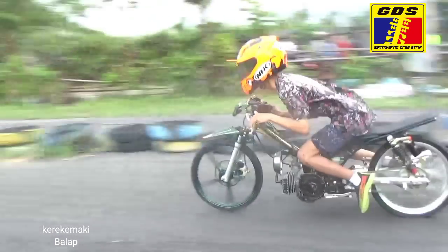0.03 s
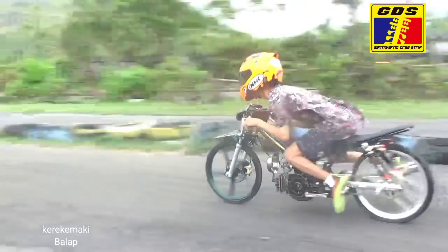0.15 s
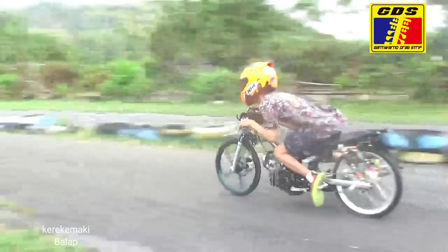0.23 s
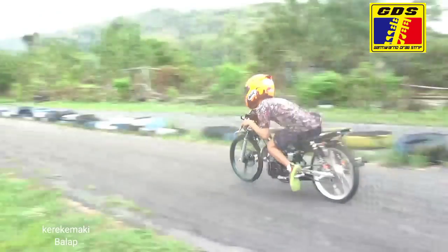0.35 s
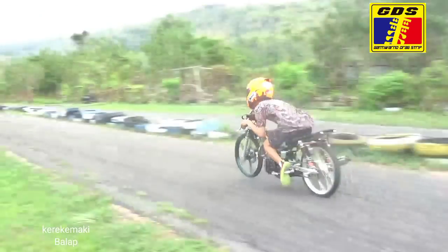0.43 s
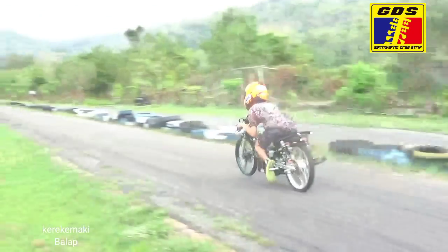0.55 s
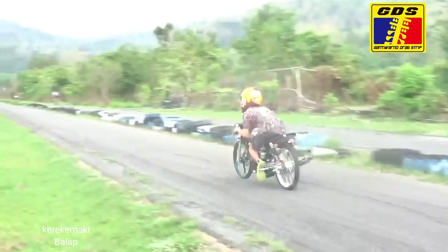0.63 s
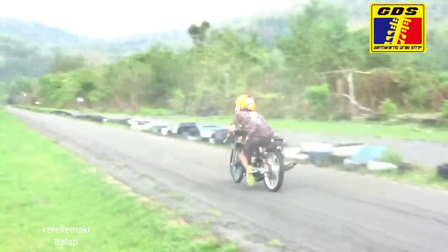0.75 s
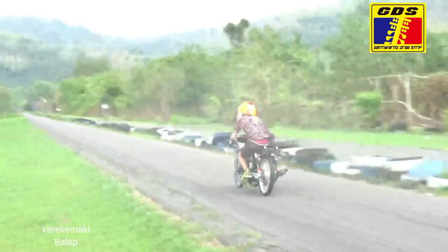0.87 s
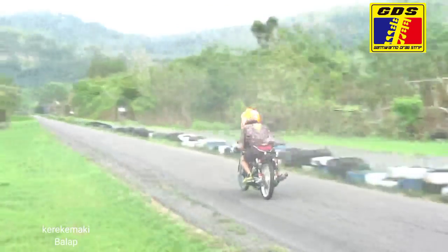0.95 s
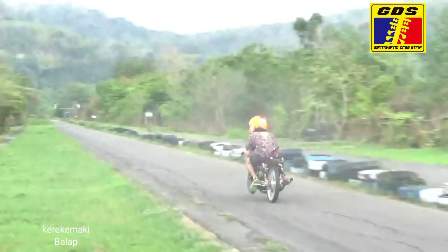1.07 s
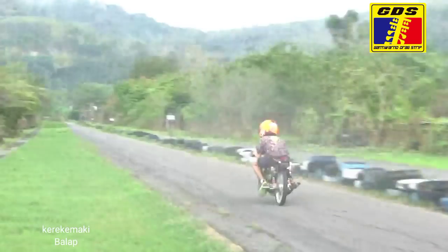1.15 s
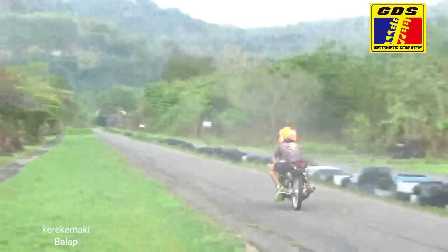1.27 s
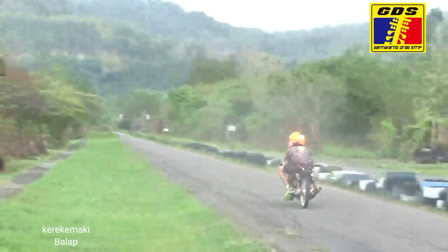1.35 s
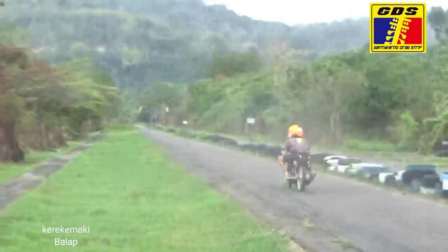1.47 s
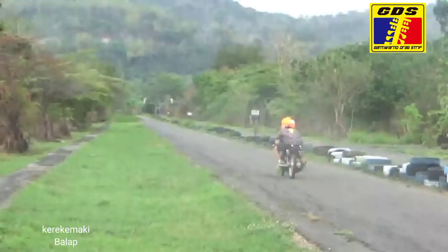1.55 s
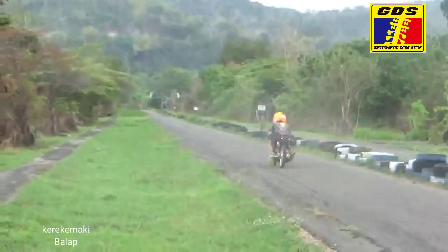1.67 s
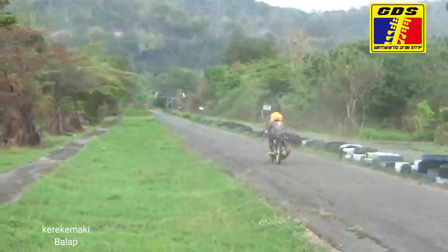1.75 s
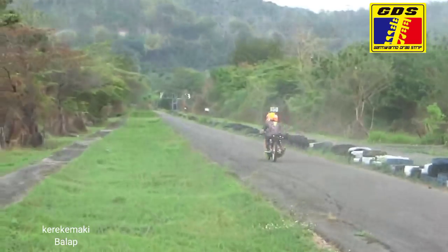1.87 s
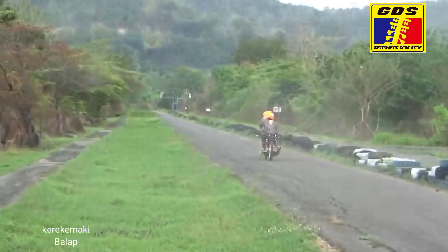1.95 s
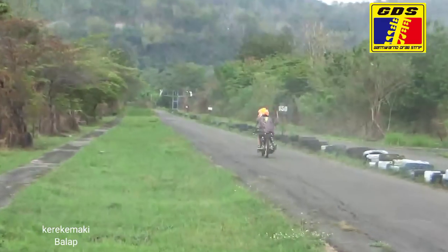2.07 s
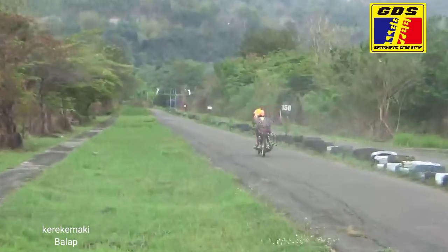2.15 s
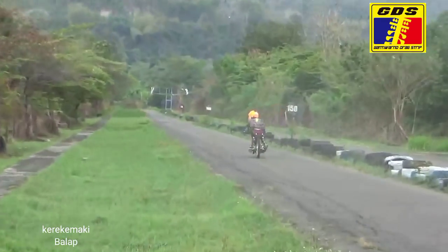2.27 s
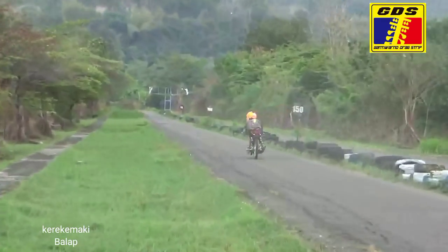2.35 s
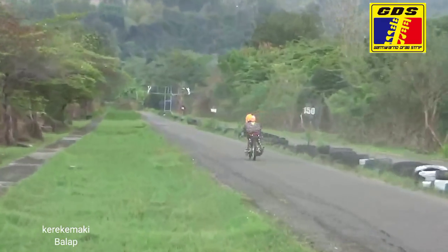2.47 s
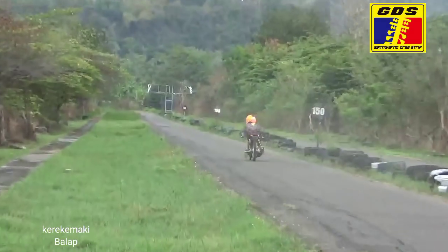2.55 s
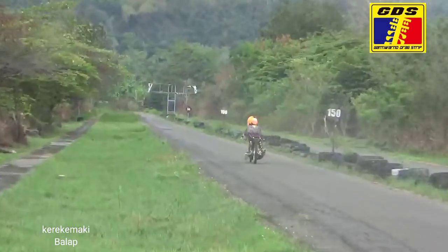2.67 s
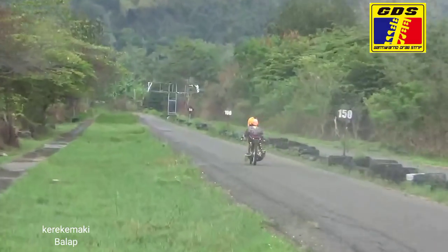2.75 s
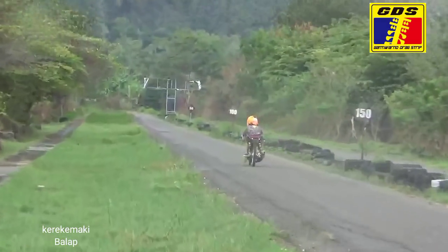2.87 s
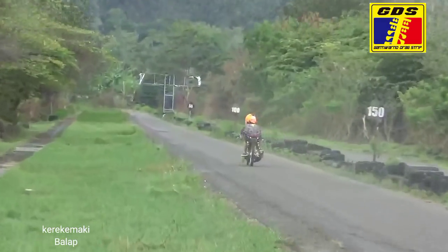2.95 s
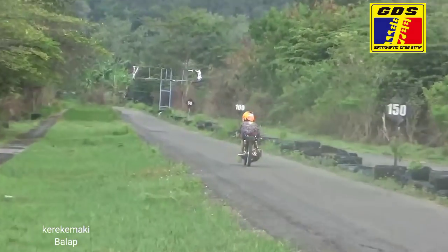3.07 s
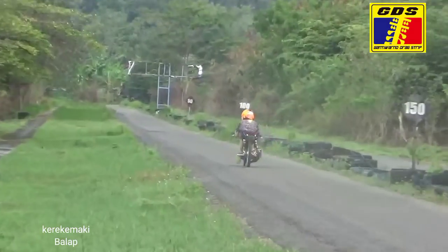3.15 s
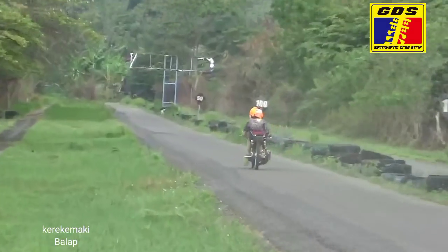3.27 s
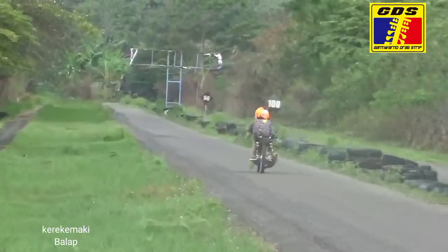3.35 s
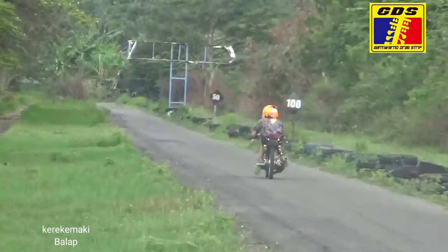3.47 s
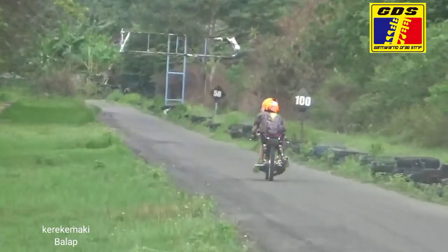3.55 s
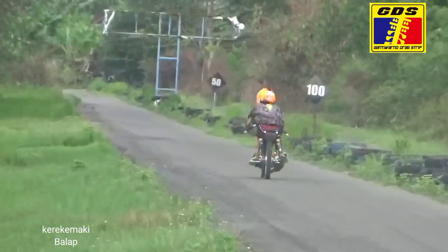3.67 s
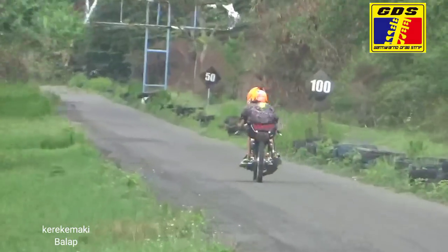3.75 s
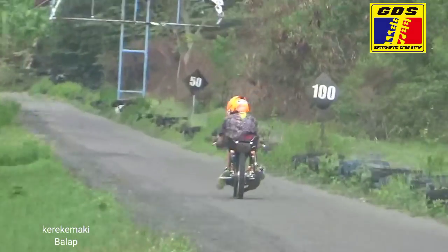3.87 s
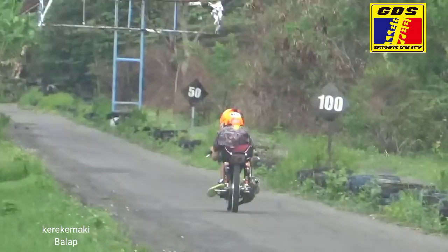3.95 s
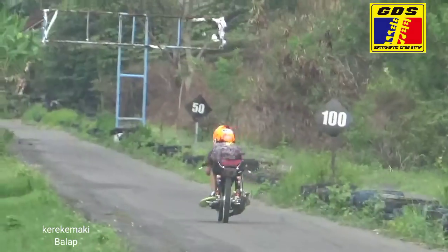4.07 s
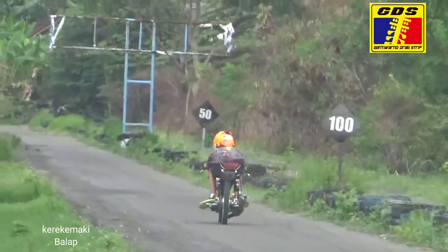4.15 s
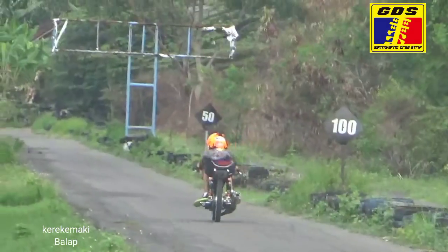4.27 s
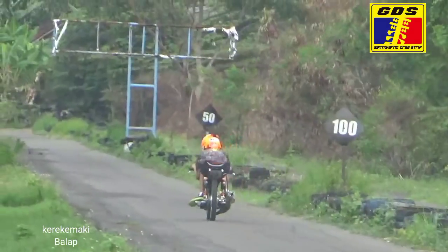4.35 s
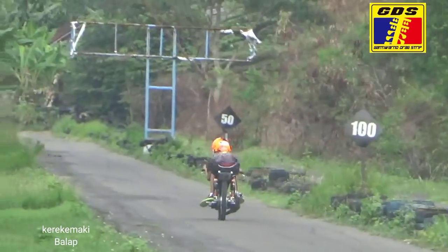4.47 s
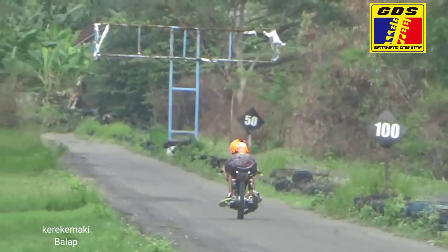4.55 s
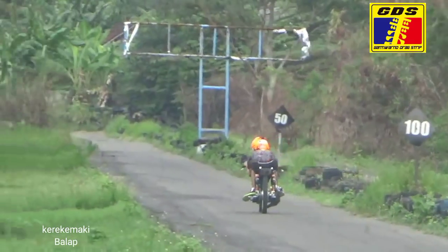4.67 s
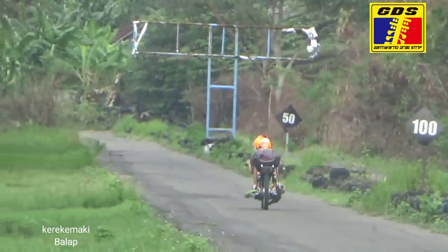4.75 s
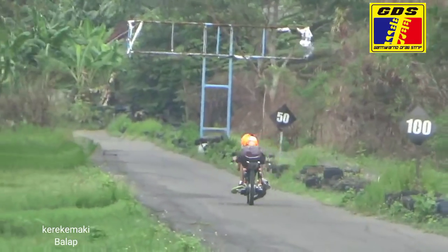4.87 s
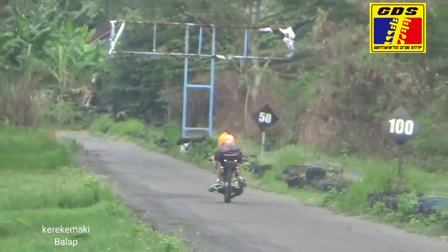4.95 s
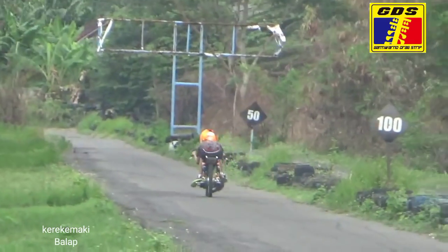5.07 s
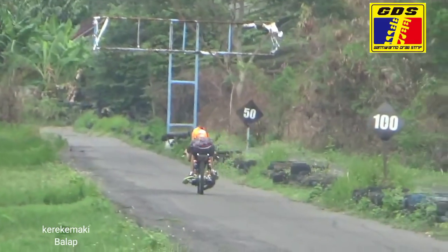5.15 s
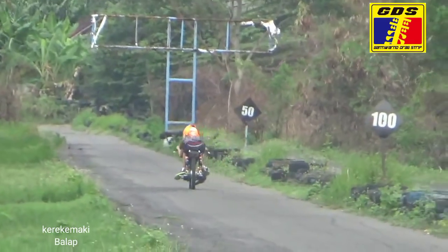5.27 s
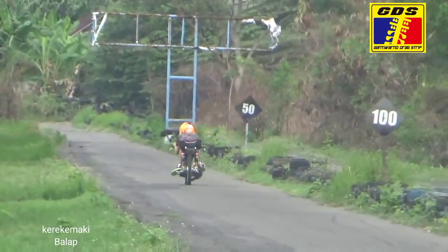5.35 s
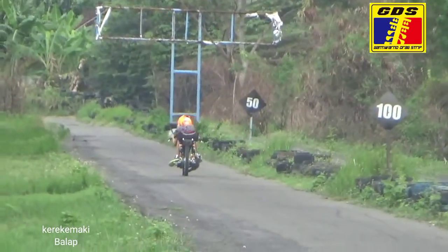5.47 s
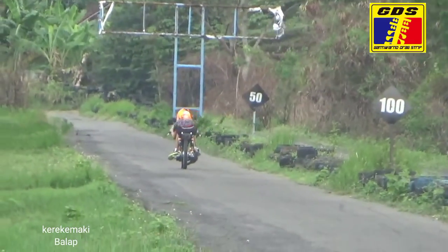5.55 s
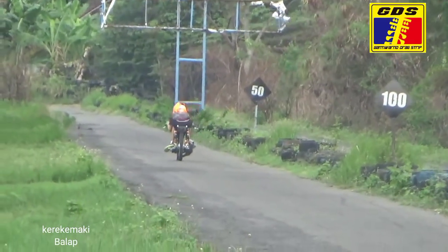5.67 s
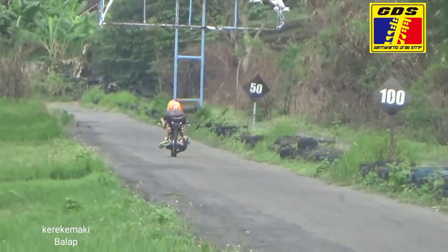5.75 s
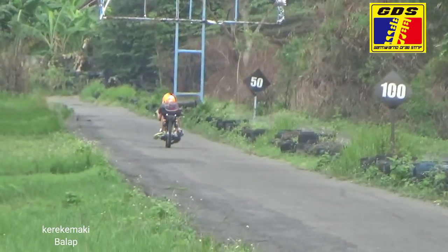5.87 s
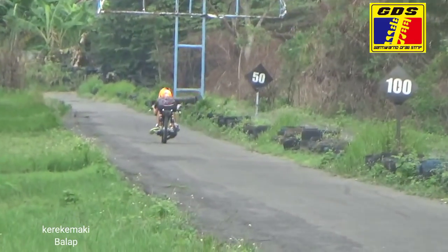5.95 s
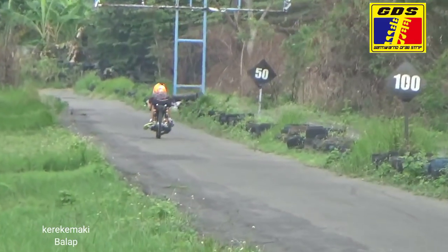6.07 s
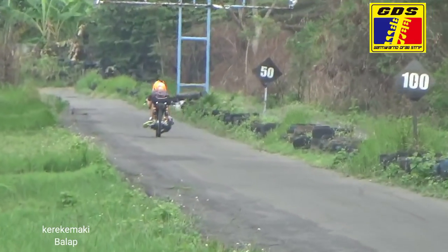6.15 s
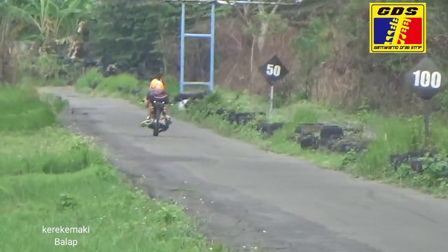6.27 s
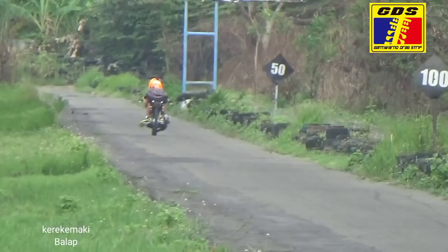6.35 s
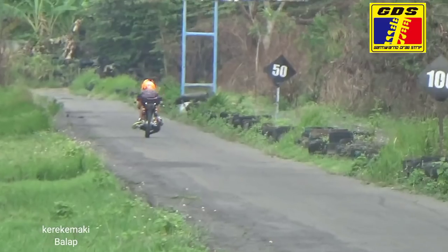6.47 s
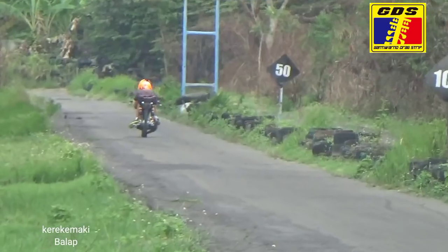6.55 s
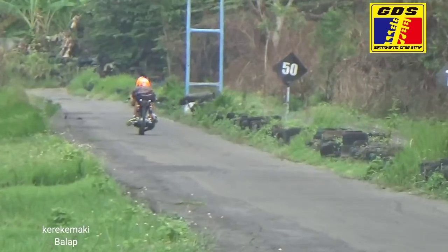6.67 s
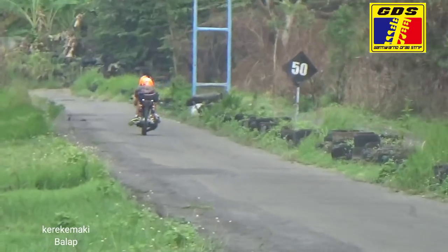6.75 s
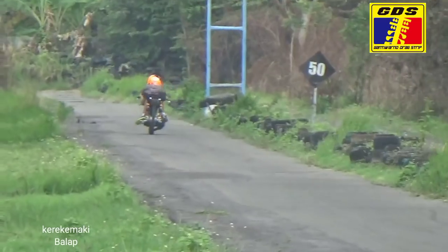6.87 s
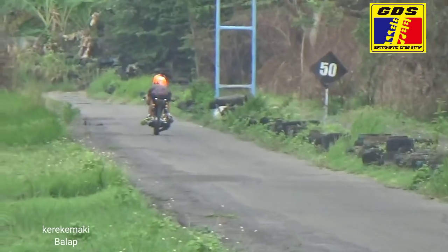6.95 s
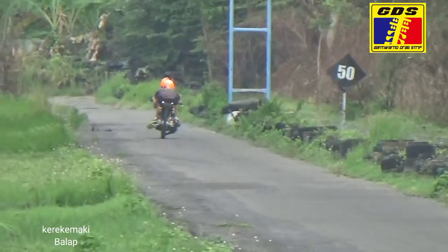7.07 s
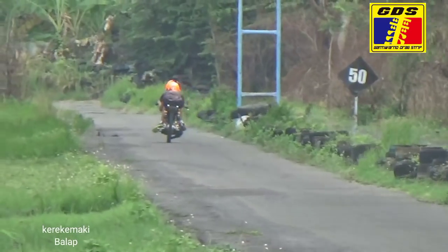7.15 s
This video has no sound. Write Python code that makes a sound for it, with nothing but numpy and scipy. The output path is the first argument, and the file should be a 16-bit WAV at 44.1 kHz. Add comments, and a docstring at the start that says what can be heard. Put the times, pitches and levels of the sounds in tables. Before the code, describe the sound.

A tuned two-stroke motorcycle passes close to the microphone with a bright, ragged buzz while a few gusts of wind thump briefly. It races away and shifts up three times, the pitch flaring, dropping with a sputter, then climbing more slowly. The exhaust grows duller and echoes off the roadside trees, and a faint low drone of distant motors emerges toward the end.

```python
"""Two-stroke motorcycle racing away

A tuned bike passes close by and races down a tree-lined strip, shifting up three times. One exhaust
blast per turn makes a harmonic series, coloured by the resonances of the pipe. Road, tyre wall and
trees reflect it, and moving air makes the partials fade in and out. Distant motors drone ever more
clearly as the bike leaves; a few gusts hit the microphone."""
import sys
import numpy as np
from scipy import signal
from scipy.io import wavfile
from scipy.ndimage import map_coordinates

SR = 44100
rng = np.random.default_rng(int(sys.argv[2]) if len(sys.argv) > 2 else 0)


def persist_wave(psi):
    """Save psi, clipped to +-1, as 16-bit WAV."""
    counts = np.round(np.clip(psi, -1, 1) * 32767).astype(np.int16)
    wavfile.write(sys.argv[1], SR, np.atleast_2d(counts).T)


N = 317961
STEP = 64   # samples per control step
SAMPLE_S, CONTROL_S = np.arange(N) / SR, np.arange(0, N + STEP - 1, STEP) / SR
LOW_PARTIALS, CUTOFF_HZ = 7, 11050

# Engine speed, one firing per turn: time_s, firing_hz
FIRING_RATE = [(0, 194.6), (0.14, 194.3), (0.3, 191.4), (0.39, 184.2), (0.52, 188.7), (0.62, 196.4),
               (0.7, 198), (0.85, 206.3), (0.91, 220), (0.97, 229.8), (1.08, 189.9), (1.14, 174.9),
               (1.245, 158.2), (1.3, 162.1), (1.68, 178.3), (2.07, 191.3), (2.15, 209.6), (2.195, 217),
               (2.29, 184.8), (2.44, 145), (2.48, 148.3), (2.65, 150.6), (2.89, 158), (3.29, 166.5),
               (3.72, 174.5), (3.87, 211), (3.93, 189.9), (4.03, 162.8), (4.08, 155), (4.22, 158),
               (4.96, 168.5), (5.5, 175), (6.41, 183.6), (6.97, 187.6), (7.21, 187.7)]
# Base level of the exhaust, whose treble thins with distance: time_s, body_db, treble_over_body_db
EXHAUST_LEVELS = [(0.0, -21, 0), (0.06, -22, 3), (0.32, -19.5, 3.5), (0.42, -20, 6), (0.8, -23, 8),
                  (0.92, -24.5, 5), (1.2, -23.5, 2), (1.22, -26.5, 7.5), (1.59, -28.5, 1.5),
                  (1.72, -31, 5.5), (1.85, -24, -3.5), (2.19, -26, -5), (2.37, -23, -8.5),
                  (2.45, -24.5, -3.5), (2.79, -21.5, -8.5), (2.97, -24, -6.5), (3.65, -23.5, -11.5),
                  (3.88, -26.5, -7.5), (4.84, -26.5, -9), (5.34, -23.5, -18), (5.4, -24.5, -14.5),
                  (6.85, -24, -17.5), (7.05, -29.5, -8.5), (7.21, -27, -14.5)]
# Frequency bands of the upper partials and the gas noise: low_hz, high_hz
BANDS = [(20, 2000), (2000, 2900), (2900, 4500), (4500, 6800), (6800, 14000)]
# Gear changes: throttle_shut_s, gear_bites_s, added_raggedness_db
GEAR_SHIFTS = [(0.9, 1.25, 3), (2.08, 2.43, 7), (3.73, 4.075, 10.5)]


def from_db(db):
    """Amplitude ratio of a level in decibels."""
    return 10 ** (np.asarray(db) / 20)


def rms_one(x):
    """Normalisation to unit mean power."""
    return x / np.sqrt(np.mean(np.abs(x) ** 2) + 1e-20)


def in_time(rows, step=1):
    """Linear interpolation of a table's columns at every step-th sample."""
    time_s, *columns = np.transpose(rows)
    return [np.interp(np.arange(0, N + step - 1, step) / SR, time_s, column) for column in columns]


def per_sample(control):
    """Linear interpolation from control steps to samples."""
    return np.interp(SAMPLE_S, CONTROL_S, control)


def at_hz(spectrum, hz):
    """Interpolation of a spectrum on a logarithmic frequency axis."""
    pitch_hz, level_db = np.transpose(spectrum)
    return np.interp(np.log(hz), np.log(pitch_hz), level_db)


def band(x, low_hz, high_hz):
    """Butterworth band-pass filter."""
    return signal.sosfilt(signal.butter(2, [low_hz, high_hz], "band", fs=SR, output="sos"), x)


def stereo_noise(width):
    """Partly coherent white noise: a side signal adds to the left and subtracts from the right."""
    mid, side = rng.standard_normal((2, N))
    return mid + width * side * [[1], [-1]]


def wander(count, rate_hz):
    """Low-pass complex Gaussian noise of unit power: count rows at control steps."""
    pole = np.exp(-2 * np.pi * rate_hz * STEP / SR)
    shape = (count, N // STEP + 1002)   # extra steps let the filter settle
    white = rng.standard_normal(shape) + 1j * rng.standard_normal(shape)
    slow = signal.lfilter([1], [1, -2 * pole, pole * pole], white)
    return rms_one(slow[:, -len(CONTROL_S):])


def distant_motors():
    """Resonance: noise confined to a few low bands drones, throbbing by random amplitude modulation."""
    # Resonances of the drone: centre_hz, width_hz, relative_db
    resonances = [(112.7, 45, 1.5), (157, 42, 0.5), (243, 15, -1.5), (310, 123, -5.5), (88.6, 117, 0.5),
                  (431, 540, -5)]
    # Gain of the drone beneath its throb: time_s, gain_db
    drone_gain = [(0, -50), (.2, -51), (.5, -55), (1.3, -59), (1.6, -60), (2.0, -52), (4, -46),
                  (5.5, -42.5), (5.9, -39.5), (6.4, -41), (7.21, -37)]
    noise = stereo_noise(width=0.24)
    drone = sum(from_db(relative_db) * rms_one(band(noise, hz - width_hz / 2, hz + width_hz / 2))
                for hz, width_hz, relative_db in resonances)
    throb_db = 3.2 * per_sample(wander(1, rate_hz=29)[0].real)
    return from_db(in_time(drone_gain)[0] + throb_db) * drone


def wind_gusts():
    """Turbulent pressure on the microphone ports makes short buffets of low noise."""
    # Bell-shaped gusts: peak_s, level_db, half_length_s
    gusts = [(0.322, -31.5, 0.051), (0.38, -25, 0.024), (0.479, -26, 0.035), (0.574, -34, 0.038)]
    envelope = sum(from_db(level_db) * np.exp(-((SAMPLE_S - peak_s) / half_s) ** 2)
                   for peak_s, level_db, half_s in gusts)
    return envelope * rms_one(band(stereo_noise(width=0.83), 38, 553))


def tree_echoes(bike):
    """Reflection from the tree lines returns dull, late copies, relatively weaker with the bike close."""
    # Echoes of the far-off bike: lag_s, left_db, right_db
    reflections = [(.045, -14.5, -15), (.083, -11, -10), (.131, -14, -10.5), (.19, -15, -19.5),
                   (.27, -15.5, -14)]
    dull = signal.sosfilt(signal.butter(1, 4000, fs=SR, output="sos"), bike)
    echoes = np.zeros((2, N))
    for lag_s, left_db, right_db in reflections:
        lag = round(lag_s * SR)
        echoes[:, lag:] += from_db([[left_db], [right_db]]) * dull[:-lag]
    near_db = -9 * np.exp(-(SAMPLE_S / 4.0) ** 2)
    return echoes * from_db(near_db)


def road_echo(direct):
    """Ground reflection: its lag shrinks with distance, so its comb with the direct sound sweeps up."""
    # Reflection from the asphalt: time_s, lag_ms, gain_db
    reflection = [(0, .64, -15), (.2, .57, -12), (.4, .48, -8), (.6, .345, -6), (.8, .245, -6),
                  (.9, .22, -9), (1.1, .17, -14), (1.3, .12, -15), (1.5, .07, -17), (2.2, .03, -20),
                  (7.21, .01, -22)]
    lag_ms, gain_db = in_time(reflection)
    read_at = np.arange(N) - lag_ms * SR / 1000
    # Only the treble beams down onto the road.
    treble = signal.sosfilt(signal.butter(2, 6500, "high", fs=SR, output="sos"), direct)
    return from_db(gain_db) * np.array([map_coordinates(side, [read_at], order=3) for side in treble])


def comb(hz, lag_ms, gain_db):
    """Interference of a wave with its echo, which a rough surface dulls by 1 dB per 900 Hz."""
    return 1 + from_db(gain_db - hz / 900) * np.exp(-2j * np.pi * hz * lag_ms / 1000)


def tyre_wall(hz):
    """Comb filtering by the reflection from a nearby tyre wall."""
    # Reflection from the wall, before dulling: time_s, lag_ms, gain_db
    reflection = [(0, 1.2, -12), (.45, 1.24, -8), (.62, 1.0, -6), (.85, .84, -6), (.95, .55, -12),
                  (1.15, .46, -7), (1.5, .31, -4), (2.1, .19, -15), (2.7, .11, -26), (7.21, .05, -60)]
    return comb(hz, *in_time(reflection, STEP))


def fading(hz, rate_hz, cell_hz=160):
    """Frequency-selective fading: partials cross a random field, independent at pitches cell_hz apart."""
    field = wander(int(hz.max() / cell_hz) + 2, rate_hz)
    where = [hz / cell_hz, np.broadcast_to(np.arange(hz.shape[1]), hz.shape)]
    return map_coordinates(field.real, where, order=1) + 1j * map_coordinates(field.imag, where, order=1)


def phase_smear(hz):
    """Random phase modulation: the path scrambles the upper partials more as it lengthens."""
    path = .3 + .12 * CONTROL_S
    # Alongside, engine, pipe and outlet each sound from their own place.
    alongside = 2.6 * np.exp(-(CONTROL_S / .65) ** 2)
    spread_rad = (path + alongside) / (1 + (1800 / hz) ** 2)
    return np.exp(1j * spread_rad * np.sqrt(2) * fading(hz, rate_hz=3.06).real)


def turbulent_air(gain, hz):
    """Scattering in moving air makes short waves fade most; gives each partial's mid and side gain."""
    gain = gain * phase_smear(hz)
    patches = np.sqrt(2) * fading(hz, rate_hz=12, cell_hz=2200).real
    flicker_db = 2 * patches / (1 + (3200 / hz) ** 4)
    gain = gain * from_db(flicker_db)
    scatter = .13 + .62 / (1 + (2200 / hz) ** 3)
    # Alongside, the lower partials break up too.
    crackle = .8 * np.exp(-(CONTROL_S / .55) ** 2) / (1 + (450 / hz) ** 4)
    scatter = np.maximum(scatter, crackle)
    slow_fade = np.sqrt(1 - scatter ** 2) + scatter * fading(hz, rate_hz=10)
    # The treble also flutters from turn to turn, more from afar.
    flutter = (.7 - .35 * np.exp(-CONTROL_S / 1.5)) / (1 + (4800 / hz) ** 3)
    mid = gain * (np.sqrt(1 - flutter ** 2) * slow_fade + flutter * wander(len(hz), rate_hz=67))
    side = gain * from_db(-11) * fading(hz, rate_hz=3)
    return mid, side


def swells_db(hz):
    """Spectral modulation: narrow stretches of the tone swell or sink for a moment."""
    # Gaussian bumps in time and pitch: peak_s, sigma_s, centre_hz, gain_db
    swells = [(0.26, 0.56, 1700, 1.5), (0.15, 0.061, 2870, 5), (1.3, 0.64, 300, 8), (4.63, .35, 455, 8),
              (0.51, 0.034, 1700, -4), (0.88, 0.16, 1050, 10), (1.07, 0.14, 3130, -10.5),
              (1.45, 0.19, 1570, 9), (1.55, 0.057, 3400, 7), (2.37, 0.11, 1020, 17), (1.79, 0.13, 1980, -8),
              (1.56, 0.43, 1140, 10), (2.56, 0.12, 2300, -7.5), (3.03, 0.48, 806, -13.5),
              (3.4, 0.58, 2180, 6.5), (3.59, 0.26, 2770, 6), (4.23, 0.4, 977, 11.5),
              (5.07, 0.14, 3030, 8.5), (4.34, 0.59, 654, 4.5), (5.5, 0.5, 1187, -5.5),
              (5.94, 0.19, 2140, 8.5), (5.89, .25, 1310, 7.5), (3, 0.33, 890, 16), (1, 0.16, 2800, 2.5),
              (6.77, 0.094, 1630, 6), (0.53, 0.2, 1680, -6.5), (0.52, 0.093, 1500, 3.5),
              (0.61, 0.093, 3100, 3.5), (0.68, 0.066, 4300, -3), (0.7, 0.095, 550, 8.5),
              (0.83, 0.089, 3960, 3.5), (0.94, 0.13, 2450, -7.5), (1.35, 0.22, 1040, 8.5),
              (3.24, .3, 1160, 4), (4.08, .08, 4300, 6.5), (5.02, .15, 670, 4), (4.96, 0.19, 3950, 5.5),
              (5.18, 0.21, 1460, -4), (5.28, .15, 2000, 4.5), (5.7, 0.17, 1850, -5), (7.2, 0.12, 2440, -8),
              (8.4, 0.081, 745, 5), (7.04, .3, 4200, -4), (6.55, 0.24, 710, 3.5), (6.37, 0.06, 1780, -27),
              (6.782, 0.15, 1170, 12)]
    sigma_octaves = 0.12
    return sum(gain_db * np.exp(-.5 * ((CONTROL_S - peak_s) / sigma_s) ** 2)
               * np.exp(-.5 * (np.log2(hz / centre_hz) / sigma_octaves) ** 2)
               for peak_s, sigma_s, centre_hz, gain_db in swells)


def throttle_shut(t, edge_s=.008):
    """Trapezoidal gate: 1 while the throttle is shut for a shift, 0 while it is open."""
    return sum(np.clip(np.minimum(t - shut_s, bite_s - t) / edge_s, 0, 1)
               for shut_s, bite_s, _ in GEAR_SHIFTS)


def raggedness(near_db):
    """Aperiodicity of the exhaust as a gain, raised close by and during a shift."""
    shut_s, _, added_db = np.transpose(GEAR_SHIFTS)
    shift_db = np.interp(SAMPLE_S, shut_s, added_db) * throttle_shut(SAMPLE_S)
    return from_db(-14.5 + near_db * np.exp(-SAMPLE_S / .3) + shift_db)


def band_levels_db(step=1):
    """Spectral envelope over time: distance thins the highest bands most, and shifts alter the balance."""
    # One row for each of BANDS: over_body_db, treble_share, shift_change_db
    balance = [(-2, 0.014, -1), (-21, 0.045, -6.7), (-7, 0.22, 2), (-8, 0.39, 0.5), (-5, 1, -0.8)]
    body_db, treble_db = in_time(EXHAUST_LEVELS, step)
    shut = throttle_shut(np.arange(len(body_db)) * step / SR)
    return [body_db + over_db + share * treble_db + shift_db * shut
            for over_db, share, shift_db in balance]


def gas_rush(turns):
    """Jet noise: turbulent gas hisses out after each blast and subsides within the turn."""
    gate = .25 + np.exp(-4 * (turns % 1))
    puffs = stereo_noise(width=0.093) * gate
    hiss = 0
    for (low_hz, high_hz), level_db in zip(BANDS, band_levels_db()):
        tilt_db = 2.5 * np.log2(high_hz / 2500) - 1
        hiss = hiss + from_db(level_db + tilt_db) * rms_one(band(puffs, max(low_hz, 800), high_hz))
    return raggedness(near_db=13) * hiss


def low_partials_db(hz):
    """Resonance lifts each low partial as it meets a mode of the pipe; low mids are fuller close by."""
    # Low resonances of the pipe: pitch_hz, over_body_db
    resonances = [(150, -20), (172, -20.5), (200, -13), (300, -33.5), (345, -23.5), (385, -19.5),
                  (450, -21), (510, -14.5), (580, -16.5), (720, -1.5), (840, -10.5), (960, -13),
                  (1080, -13.5), (1340, -15.5), (1600, -3.5)]
    near = np.exp(-(CONTROL_S / 3) ** 2)
    low_mids = np.exp(-(np.log2(hz / 400) / 0.8) ** 2)
    body_db = in_time(EXHAUST_LEVELS, STEP)[0]
    return body_db + at_hz(resonances, hz) + 8.5 * near * low_mids


def pipe_spectrum(hz):
    """Source-filter principle: pipe resonances and short echoes set each partial's complex gain."""
    # Response of the pipe: pitch_hz, relative_db
    response = [(150, -12), (740, 28), (1250, -2), (1650, 6), (1950, 0), (2350, 5.5), (2700, 1), (3050, 1),
                (3600, -6.5), (5600, -21), (11000, -34.5)]
    cone_echo = comb(hz, lag_ms=4.35, gain_db=-12)   # the blast returns once from the chamber's cone
    colour = from_db(at_hz(response, hz)) * cone_echo * tyre_wall(hz)
    upper = colour * (np.arange(len(hz))[:, None] >= LOW_PARTIALS)
    gain = 0
    for (low_hz, high_hz), level_db in zip(BANDS, band_levels_db(STEP)):
        in_band = upper * (1 / (1 + (low_hz / hz) ** 8) - 1 / (1 + (high_hz / hz) ** 8))
        power = np.sum(np.abs(in_band) ** 2, axis=0) / 2
        gain = gain + in_band * from_db(level_db) / np.sqrt(power)
    # The low partials take only their phase from the echoes.
    low_amplitude = np.sqrt(2) * from_db(low_partials_db(hz[:LOW_PARTIALS]))
    gain[:LOW_PARTIALS] = low_amplitude * np.exp(1j * np.angle(colour[:LOW_PARTIALS]))
    blast_rad = 2.4 - 0.053 * (hz / 1000) ** 2   # a downward swing, its treble trailing a little
    return gain * from_db(swells_db(hz)) * (hz < CUTOFF_HZ) * np.exp(1j * blast_rad)


def exhaust_blasts(turns, partials=68):
    """A pulse train is a sum of harmonics of the firing rate; unequal burns add jitter and shimmer."""
    hz = np.arange(1, partials + 1)[:, None] * in_time(FIRING_RATE, STEP)[0]
    mid_gain, side_gain = turbulent_air(pipe_spectrum(hz), hz)
    burns = rng.standard_normal((int(turns[-1]) + 2, 2))
    strength, earliness = (np.interp(turns + .5, np.arange(len(burns)), column) for column in burns.T)
    # The sharp front of a blast wavers in time; its slow swing does not.
    front = turns + .021 * raggedness(near_db=3) * earliness
    steady, wavering = np.exp(2j * np.pi * turns), np.exp(2j * np.pi * front)
    harmonic, mid, side = 1, 0, 0
    for k in range(partials):
        harmonic = harmonic * (steady if k < LOW_PARTIALS else wavering)
        mid = mid + (per_sample(mid_gain[k]) * harmonic).real
        side = side + (per_sample(side_gain[k]) * harmonic).real
    sputter_db = (.4 + 2.2 * throttle_shut(SAMPLE_S)) * strength
    return (mid + side * [[1], [-1]]) * from_db(sputter_db)


def scene():
    """Superposition of the bike, its echoes, the distant motors and the wind."""
    # Stereo balance of the bike: time_s, left_over_right_db
    pan = [(0.0, -3.0), (0.9, -0.5), (2.67, 1.0), (4.74, 1.0), (5.1, 0.0), (5.92, 1.0), (6.47, -1.0),
           (6.69, 1.0), (7.21, 0.0)]
    turns = np.cumsum(in_time(FIRING_RATE)[0]) / SR
    direct = exhaust_blasts(turns) + gas_rush(turns)
    bike = (direct + road_echo(direct)) * from_db(in_time(pan)[0] / 2 * [[1], [-1]])
    return bike + tree_echoes(bike.mean(axis=0)) + distant_motors() + wind_gusts()


def record(dry):
    """Capsule resonance lifts the treble; deep bass is cut, saturation rounds peaks, the top is cut."""
    peak_hz, width_hz, lift_db = 9060, 1930, 7.24
    resonance = signal.lfilter(*signal.iirpeak(peak_hz, peak_hz / width_hz, fs=SR), dry)
    bright = dry + (from_db(lift_db) - 1) * resonance
    lean = signal.sosfilt(signal.butter(2, 60, "high", fs=SR, output="sos"), bright)
    rounded = .72 * np.tanh(lean / .72)
    return signal.sosfilt(signal.ellip(12, .5, 75, CUTOFF_HZ, fs=SR, output="sos"), rounded)


dry = scene()
out = record(dry)
persist_wave(out)
```